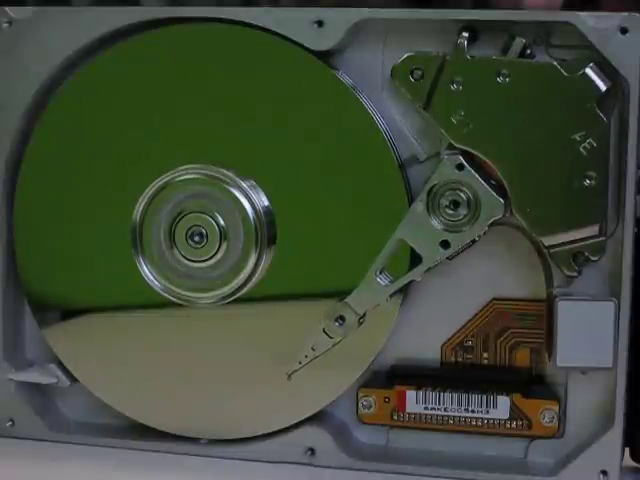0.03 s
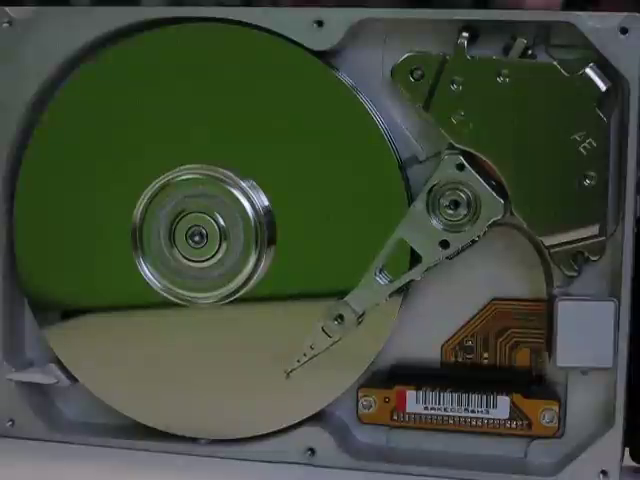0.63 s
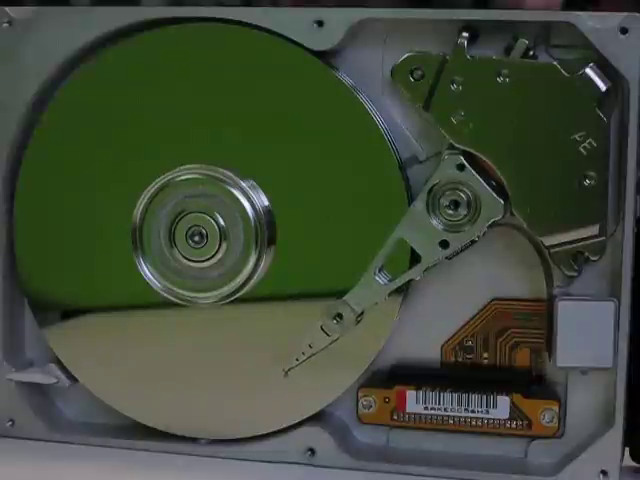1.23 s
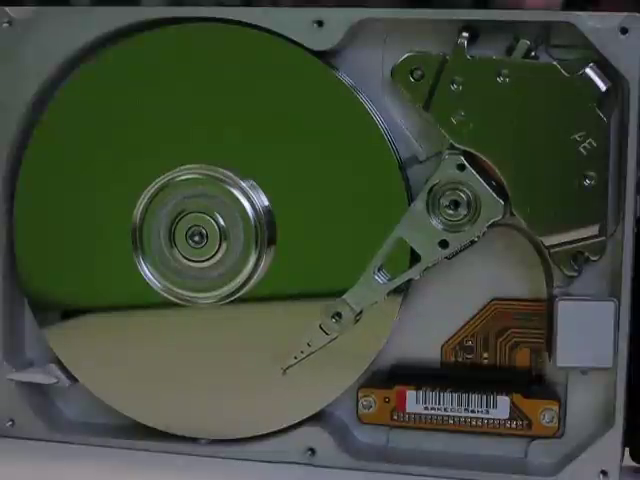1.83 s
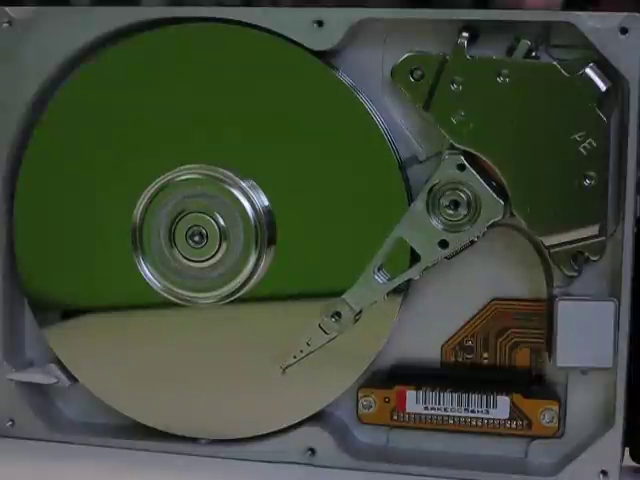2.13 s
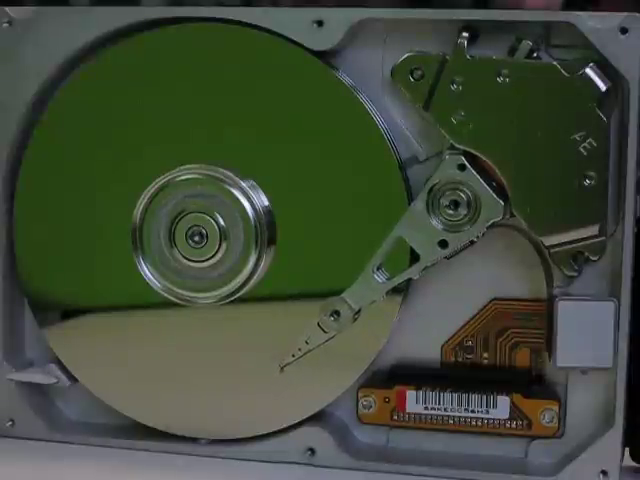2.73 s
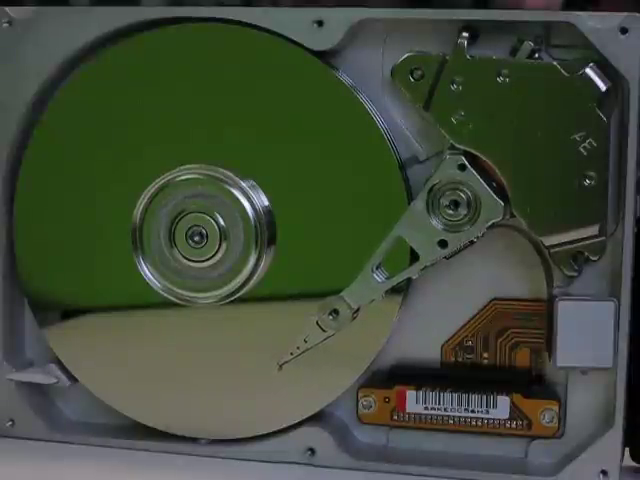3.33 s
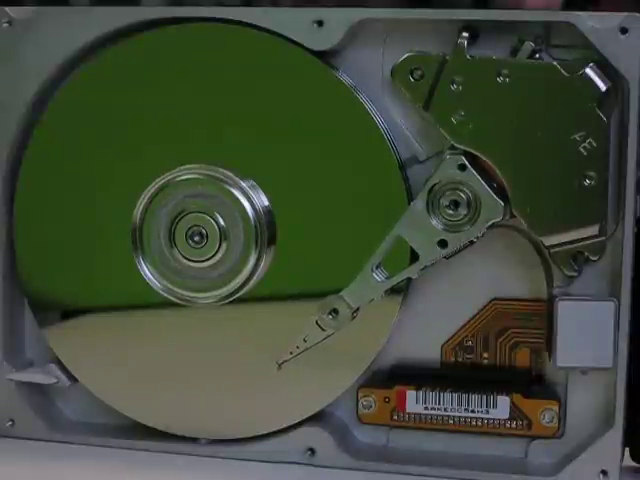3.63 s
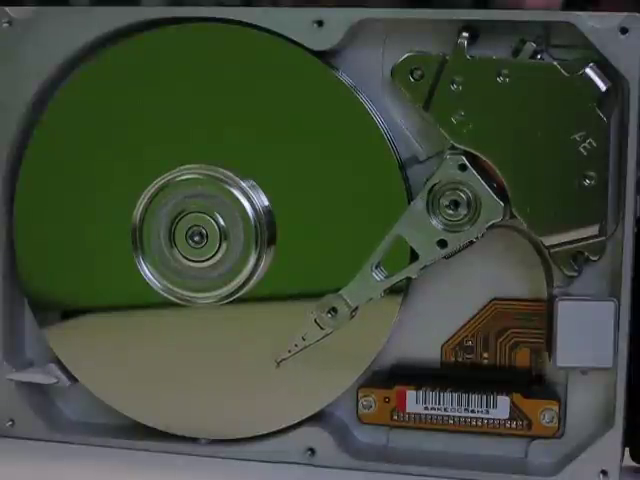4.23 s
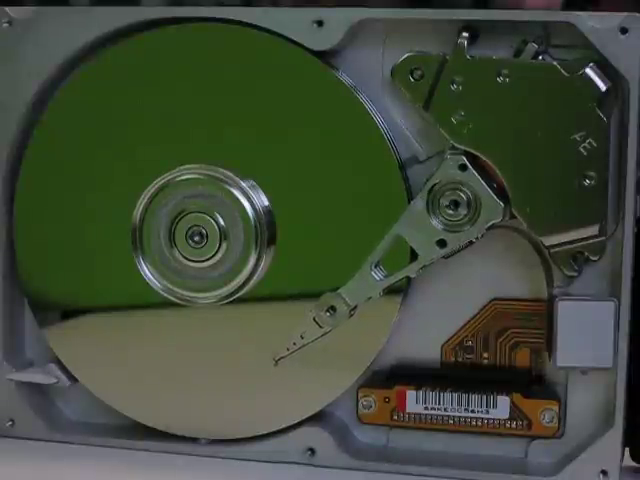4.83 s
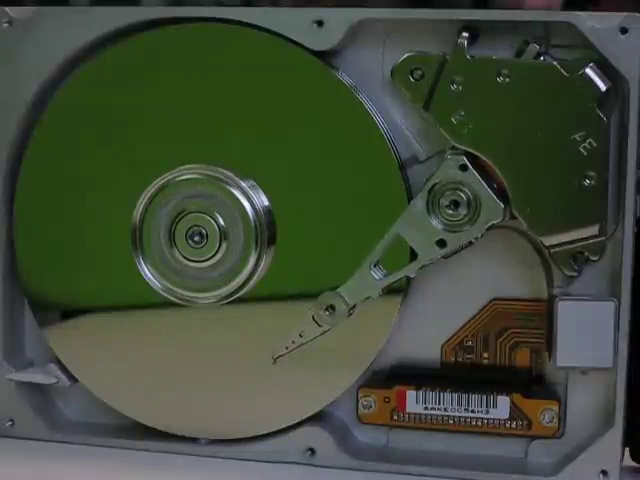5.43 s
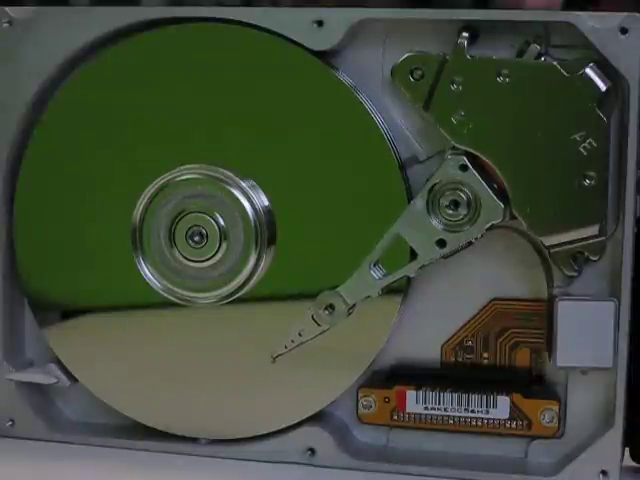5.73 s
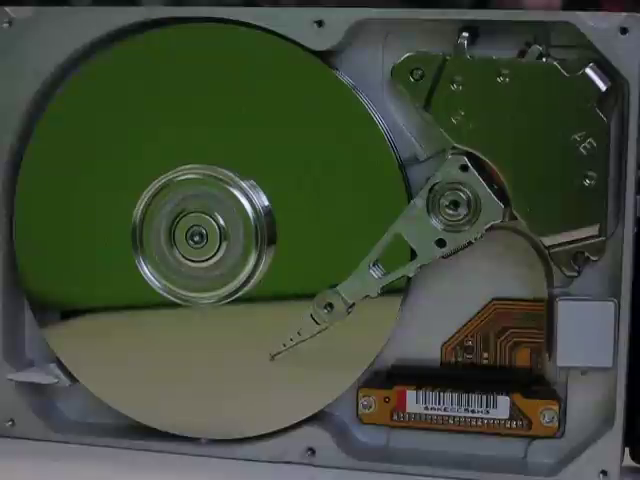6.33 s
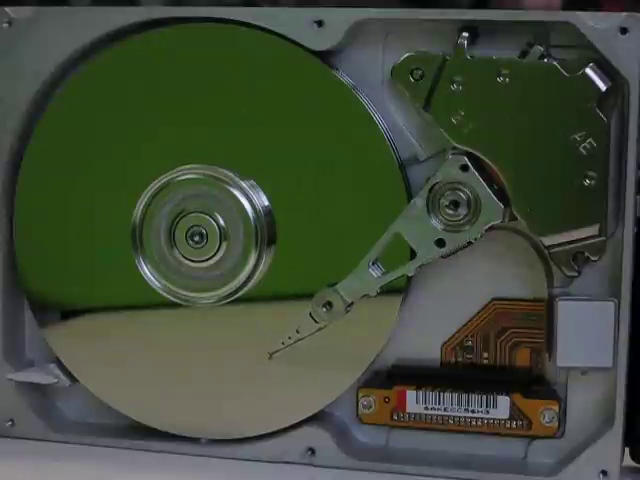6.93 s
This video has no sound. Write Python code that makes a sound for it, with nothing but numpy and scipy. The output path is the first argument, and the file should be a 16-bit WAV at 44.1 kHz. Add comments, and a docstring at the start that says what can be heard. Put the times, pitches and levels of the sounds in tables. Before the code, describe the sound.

An open hard disk drive runs on a desk, heard close up for about seven seconds. It is already at full speed and stays there. Air rushes off the spinning platters in an even, slightly metallic whir, while the motor and bearings hold a high whine of several steady tones, with a fine shimmer above and a weak hum below.

In the first 0.2 seconds, the head arm makes a few longer swings, heard as quick, slightly firmer clicks. It then steps evenly about seven times a second, each step a faint, short metallic tick over the whir, some ringing a little more than others. At about 6.1 to 6.2 seconds comes a second tight cluster of stronger clicks. The regular ticking then resumes and continues with the unchanged whir and whine to the end.

```python
"""An open hard disk drive spinning on a desk, the microphone close up.
Air rushes off the platters and rings them and the casting; motor and bearings whine in steady tones.
Over this bed the head arm steps about seven times a second with a faint tick, and twice makes
a few longer swings. The microphone has one narrow notch in the treble."""
import sys
import numpy as np
from scipy import signal
from scipy.fft import rfft, irfft
from scipy.io import wavfile
from scipy.ndimage import uniform_filter1d

SR = 44100
rng = np.random.default_rng(int(sys.argv[2]) if len(sys.argv) > 2 else 0)


def put_to_file(sound):
    """Save the sound as 16-bit audio at rate SR, in the file named by the first command-line argument."""
    columns = np.atleast_2d(sound).T  # one column per channel
    safe = np.clip(columns, -1, 1)
    whole_steps = np.round(safe * 32767)
    wavfile.write(sys.argv[1], SR, whole_steps.astype(np.int16))


N = 316197
TIME = np.arange(N) / SR
FREQ = np.maximum(np.arange(N // 2 + 1) * SR / N, 1)

# arm moves that stand out, long swings and hard-ringing steps:
# (mid-move time [s], time to speed up [ms], click gain [dB], arm ring gain [dB])
SEEKS = [(0.051, 0.9, 10, 5), (0.1139, 2.3, 13, 6), (0.1526, 2.1, 13, 7), (1.018, 0.9, 8, 6.5),
         (1.29, 0.9, 9, 7), (2.913, 0.9, 6, 9.5), (3.594, 0.9, 6, 10), (4.129, 0.9, 7, 9),
         (4.402, 0.9, 7, 7.5), (4.959, 0.9, 7.5, 7.5), (5.098, 0.9, 7, 7.5), (6.071, 0.9, 7, 8.5),
         (6.1173, 3.6, 13, 11), (6.153, 0.9, 8, 3), (6.1605, 1.5, 10, 4), (6.1913, 0.9, 10, 6),
         (6.2008, 3.5, 13, 7), (6.359, 0.9, 7, 8), (6.917, 0.9, 7, 6.5)]


def undb(db):
    """Decibels to amplitude."""
    return 10 ** (np.asarray(db) / 20)


def walk(rate_hz):
    """A smooth random curve of spread 1 that turns about rate_hz times a second."""
    hold = max(int(SR / rate_hz), 1)
    slow = uniform_filter1d(np.repeat(rng.standard_normal(N // hold + 2), hold), hold)[:N]
    return slow / slow.std()


def add(out, start_s, sound):
    """Mix a short sound in at start_s."""
    i = max(int(start_s * SR), 0)
    out[i:i + len(sound)] += sound[:max(N - i, 0)]


def platter_air(flutter_db=0.32):
    """Turbulence off the platters, coloured by the metal that it shakes."""
    # spectrum of the rushing air: (frequency [Hz], level [dB])
    air_spectrum = [(20, -93), (50, -87), (130, -85.5), (220, -79), (420, -78), (600, -71.5), (1500, -69),
                    (3400, -71.5), (5700, -75.5), (7000, -83.0), (8600, -89), (11500, -83), (13200, -93),
                    (15500, -105.6)]
    # resonances and dips of platters and casting: (centre [Hz], width [Hz], gain [dB])
    resonances = [(210, 9.3, 5), (248, 9.3, 7.5), (252, 8.9, -3.5), (276.7, 14, 8.5), (303.7, 11, 6.5),
                  (930, 94, -3.5), (1760, 340, -4.5), (1957, 18, 6), (2130, 150, 3.5), (2150, 33, -2.5),
                  (2490, 63, 4.5), (2880, 25, 0), (2910, 160, 4.5), (3700, 620, 4), (4433, 220, 6.5),
                  (9180, 910, 5.5), (11350, 300, -7), (11600, 878, 6.5)]
    # the rush eases slightly at first, then holds: (time [s], level [dB])
    rush_levels = [(0.0, 0.66), (1.8, -0.5)]
    hz, db = np.transpose(air_spectrum)
    colour_db = np.interp(np.log(FREQ), np.log(hz), db)
    colour_db += sum(gain / (1 + (2 * (FREQ - centre) / width) ** 2)
                     for centre, width, gain in resonances)
    rush = irfft(rfft(rng.standard_normal(N)) * undb(colour_db), N) * np.sqrt(SR / 2)
    ease_db = np.interp(TIME, *np.transpose(rush_levels))
    return rush * undb(ease_db - ease_db.mean() + flutter_db * walk(25))


def spindle(shaft_hz=120.025, bearing_a_hz=522.59, bearing_b_hz=504.55, waver=0.091, speed_jitter=6e-5):
    """Motor and two ball bearings: tones locked to the regulated shaft, each wavering in strength."""
    # motor whine: (multiple of the shaft rate, level [dB])
    motor_orders = [(33, -55), (36, -42.3), (38, -54.5), (43, -58)]
    # whine of each bearing: (multiple of its rolling rate, level [dB])
    bearing_a_orders = [(6, -52), (7, -49), (9, -58.5), (11, -56.5), (12, -53.5), (19, -63), (20, -63),
                        (22, -62)]
    bearing_b_orders = [(7, -54.5), (8, -55), (9, -56), (12, -56), (18, -65), (22, -63), (23, -52.5)]
    # out-of-round balls, some tones fading or growing as the balls tumble:
    # (frequency [Hz], starting level [dB], drift [dB/s])
    ball_tones = [(3496.2, -50.5, 0), (3596.4, -51.3, 0), (3648.6, -49.4, 0), (4003, -44, -1.8),
                  (4055.2, -60, 1.3), (4107.3, -58, 1), (4908.8, -56.5, 0), (5264.4, -55.5, 0),
                  (5395.5, -53.5, 0), (6041.7, -55, 0), (11328.2, -52.6, 0), (11519.1, -57.6, 0),
                  (11658.5, -61, 1), (11705.8, -58.6, 0)]
    # low hum of the spinning drive: (frequency [Hz], level [dB])
    hum_tones = [(120, -73), (320, -57.5), (400, -66), (480, -65), (520, -66), (600, -61), (640, -61),
                 (680, -61), (760, -54.5), (1080, -61), (1160, -63), (1440, -63)]
    shaft_time = TIME + np.cumsum(speed_jitter * walk(12)) / SR

    def tone(hz):
        cycles = hz * shaft_time + rng.random()
        return np.sqrt(2) * np.sin(2 * np.pi * cycles) * (1 + waver * walk(11))

    def series(rate_hz, orders):
        return sum(tone(order * rate_hz) * undb(db) for order, db in orders)

    motor = series(shaft_hz, motor_orders)
    bearings = series(bearing_a_hz, bearing_a_orders) + series(bearing_b_hz, bearing_b_orders)
    balls = sum(tone(hz) * undb(db + drift * TIME) for hz, db, drift in ball_tones)
    hum = sum(tone(hz) * undb(db) for hz, db in hum_tones)
    return undb(0.54) * motor + undb(0.3) * bearings + undb(0.45) * balls + undb(-1.5) * hum


def bearing_shimmer(tones_per_cluster=30, scatter_db=6):
    """Waviness of balls and races gives crowds of weak tones that beat against each other."""
    # clusters of bearing tones: (centre [Hz], half-width [Hz], cluster level [dB])
    clusters = [(5510, 900, -48.5), (9870, 1100, -62), (11640, 480, -53.5), (12760, 530, -57)]
    spectrum = np.zeros(len(FREQ), complex)
    for centre, half_width, db in clusters:
        place, strength, phase = rng.uniform(-1, 1, (tones_per_cluster, 3)).T
        bins = np.clip((centre + half_width * place) * N / SR, 1, len(FREQ) - 1).astype(int)
        sizes = undb(scatter_db * strength)
        spectrum[bins] += undb(db) * sizes / np.linalg.norm(sizes) * np.exp(1j * np.pi * phase)
    return irfft(spectrum, N) * N / np.sqrt(2)


def head_arm(click_db=-37.5, arm_db=-33, recoil_db=-42, clack_db=-36, edge_db=-2.5, settle_ms=3.8):
    """Each move has three jerks: the coil pushes, reverses to brake (the hardest), and lets go."""
    # modes of the casting, shaken by the arm's recoil: (frequency [Hz], t60 [ms], level [dB])
    casting_modes = [(120, 88, -12), (696, 74, -2.5), (1230, 32, 4), (1840, 50, 3), (2410, 28, -5)]
    # modes of the coil and head suspension: (frequency [Hz], t60 [ms], level [dB])
    coil_modes = [(8400, 4.1, -4), (9540, 3.64, 0), (13200, 3, -15), (14600, 3, -19)]
    out = np.zeros(N)
    for mid_s, push_ms, click_gain_db, ring_gain_db in SEEKS + track_steps():
        move_ms = 2 * push_ms + settle_ms
        # a longer push gives more speed: the arm bends more gently, but recoils harder on the casting
        speed = np.sqrt(push_ms)
        bend = undb(arm_db + ring_gain_db) / speed * arm_flex(move_ms)
        add(out, mid_s - move_ms / 2 / 1000, bend)
        recoil = undb(recoil_db) * push_ms * metal_ring(casting_modes, rise_ms=0.69)
        add(out, mid_s - push_ms / 1000, recoil)
        for side, jerk in ((-1, undb(edge_db)), (0, -1.88), (0.93, undb(edge_db))):
            tick = undb(click_db + click_gain_db) * np.sqrt(speed) * metal_ring(coil_modes, rise_ms=0.28)
            clack = speed * undb(clack_db) * casting_clack()
            add(out, mid_s + (side * push_ms - 0.5) / 1000, jerk * (tick + clack))
    return out


def arm_flex(move_ms, detune=0.016):
    """The arm's bending modes swell under the push and die as the servo settles it."""
    # bending modes of the arm: (frequency [Hz], level [dB])
    arm_modes = [(3720, -8), (3950, 1), (5400, -11.5)]
    t = TIME[:int(move_ms * SR / 1000)]
    chances = rng.uniform(-0.89, 1, (len(arm_modes), 2))
    swing = sum(undb(db) * np.sin(2 * np.pi * hz * (1 + detune * shift) * t + np.pi * phase)
                for (hz, db), (shift, phase) in zip(arm_modes, chances))
    return swing * np.hanning(len(t))


def metal_ring(modes, rise_ms, detune=0.016):
    """Modes dying away after one soft-edged jerk, tuned a little differently every time."""
    t = TIME[:SR // 10]
    shifts = rng.standard_normal(len(modes))
    swing = sum(undb(db - 60 * t * 1000 / t60_ms) * np.cos(2 * np.pi * hz * (1 + detune * shift) * t)
                for (hz, t60_ms, db), shift in zip(modes, shifts))
    onset = 1 - np.exp(-(t * 1000 / rise_ms) ** 2)
    return swing * onset


def casting_clack(band_hz=(600, 5200), t60_ms=55):
    """The casting's many close modes blur into a short burst of noise."""
    t = TIME[:SR // 10]
    burst = rng.standard_normal(len(t)) * undb(-60 * t * 1000 / t60_ms)
    return signal.sosfilt(signal.butter(3, band_hz, "band", fs=SR, output="sos"), burst)


def track_steps(push_ms=0.9, click_scatter_db=1, ring_scatter_db=2, busy_s=0.012):
    """The arm's even one-track steps, as rows like SEEKS; a step is skipped where a seek falls."""
    # runs of steps, each lasting until the next begins:
    # (start [s], interval [ms], click gain [dB], arm ring gain [dB])
    runs = [(0.188, 139.7, 9.5, -2), (1.158, 131.4, 7.5, 4.5), (2.088, 135, 6.5, 5.5),
            (2.775, 137.3, 5, 3.5), (3.46, 133.6, 6, 1), (4.402, 138.9, 6.5, 2), (6.22, 138.9, 6.5, 3)]
    ends = [run[0] for run in runs[1:]] + [N / SR]
    moves = []
    for (start, interval_ms, click_db, ring_db), end in zip(runs, ends):
        interval_s = interval_ms / 1000
        for mid_s in np.arange(start, end - interval_s / 2, interval_s):
            click_gain_db = rng.normal(click_db, click_scatter_db)
            ring_gain_db = rng.normal(ring_db, ring_scatter_db)
            if all(abs(mid_s - seek[0]) > busy_s for seek in SEEKS):
                moves.append((mid_s, push_ms, click_gain_db, ring_gain_db))
    return moves


def scene():
    """The drive from close up, in mono: a bed of air and whine with the arm ticking over it."""
    return (platter_air() + spindle() + bearing_shimmer() + head_arm())[None]


def record(dry, notch_hz=7875, notch_width_hz=520, top_hz=15720):
    """The microphone has one deep, narrow notch in the treble; the top is cut steeply."""
    offset_hz = FREQ - notch_hz
    notched = irfft(rfft(dry) * offset_hz / (offset_hz - 1j * notch_width_hz), N)
    high_cut = signal.ellip(10, 0.2, 80, top_hz, fs=SR, output="sos")
    return signal.sosfilt(high_cut, notched)


dry = scene()
out = record(dry)
put_to_file(out)
```